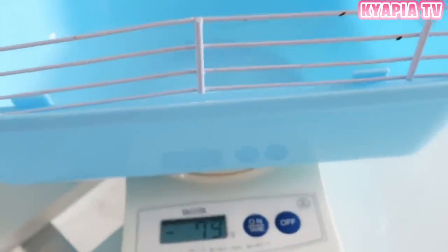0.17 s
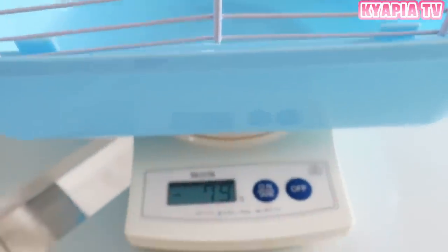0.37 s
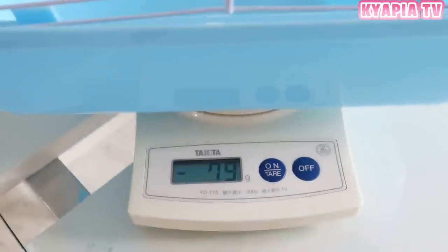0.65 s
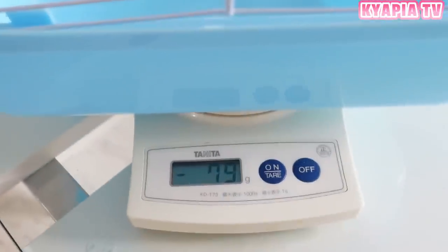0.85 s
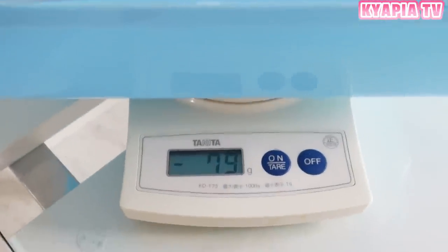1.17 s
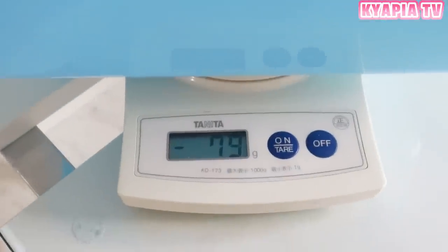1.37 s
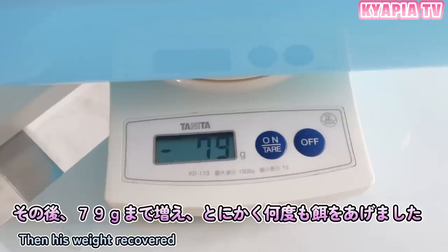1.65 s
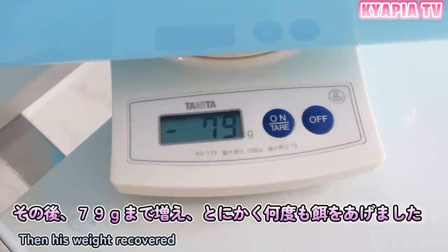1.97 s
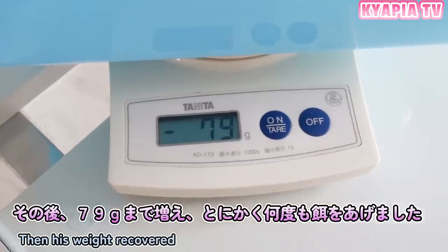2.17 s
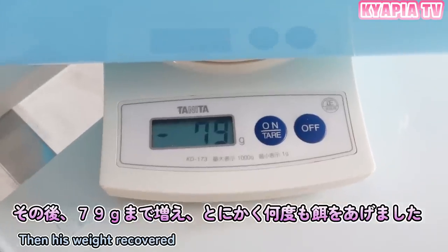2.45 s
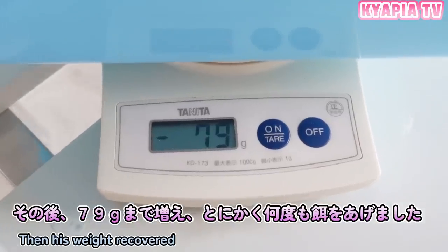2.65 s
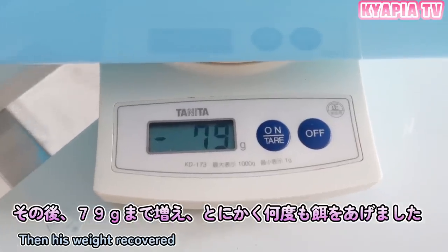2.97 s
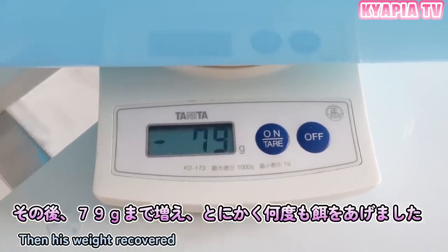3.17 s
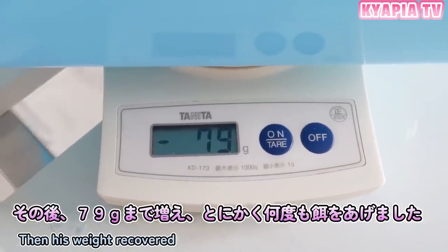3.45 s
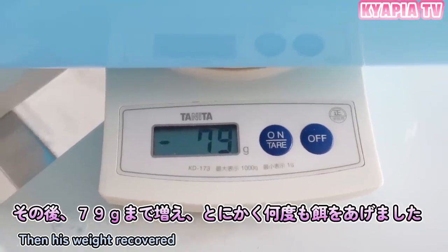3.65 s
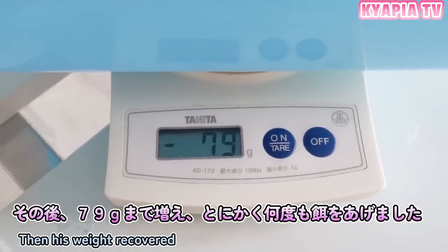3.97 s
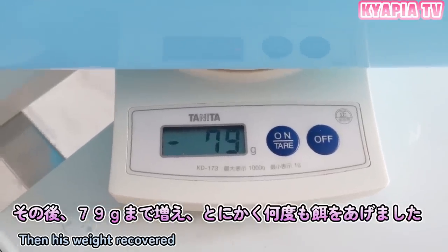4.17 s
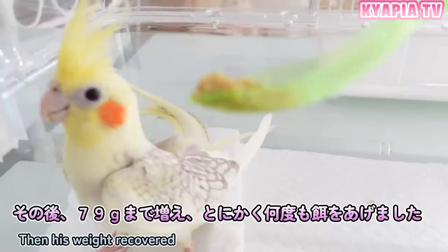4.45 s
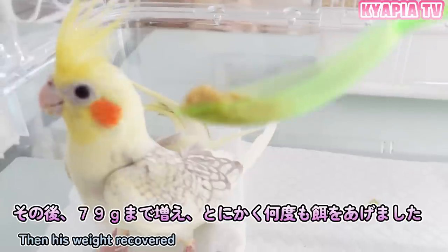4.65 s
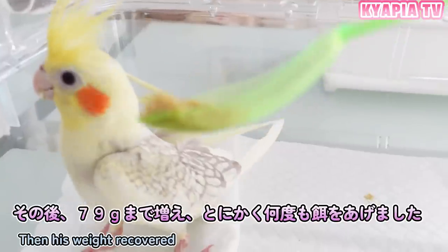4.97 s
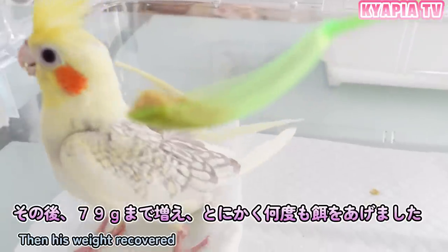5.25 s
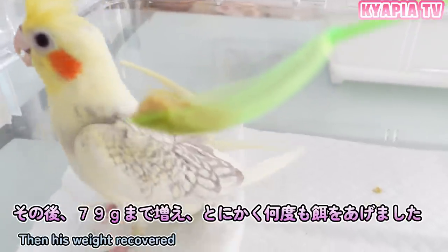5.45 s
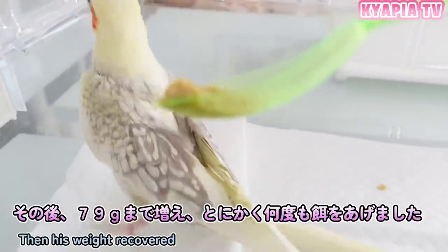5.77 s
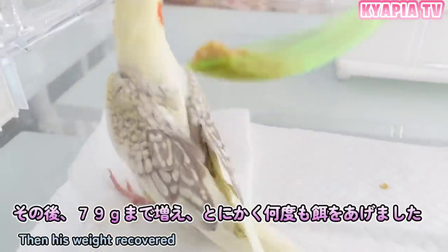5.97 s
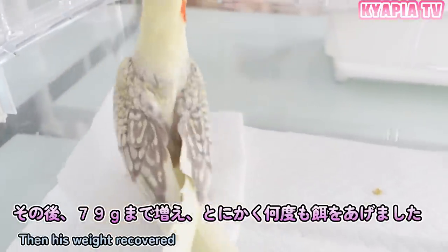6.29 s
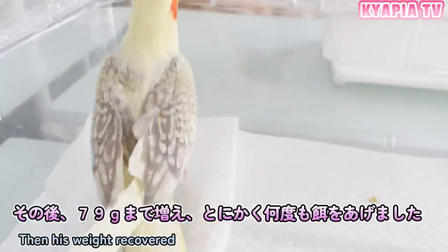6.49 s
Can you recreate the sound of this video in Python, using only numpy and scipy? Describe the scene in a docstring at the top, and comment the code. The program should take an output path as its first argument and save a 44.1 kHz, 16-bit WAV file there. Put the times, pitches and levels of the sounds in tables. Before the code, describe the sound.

A young cockatiel squawks harshly and squeaks among distant chirps and hollow knocks, then gives a loud rising whistle and finally soft begging rasps.

```python
"""Over a soft room wash and a low rumble, other birds chirp further off and things are knocked hollowly.
Claws tick and shuffle on paper, as a cockatiel chick squawks harshly, then breaks into thin squeaks.
Later come one loud gliding whistle, an abrupt click with a short noise burst, then a hiss and soft begging
rasps as its feet scratch. Voices are harmonics shaped by throat or beak; knocks are noise with ringing tones;
the rest is filtered noise. Echoes in a hard-walled room are added to all but wash and rumble."""
import sys
import numpy as np
from scipy import signal
from scipy.fft import rfft, irfft, next_fast_len
from scipy.io import wavfile
from scipy.ndimage import map_coordinates

SR = 44100
rng = np.random.default_rng(int(sys.argv[2]) if len(sys.argv) > 2 else 0)


def dump(signal):
    """Clip the signal to [-1, 1] and save it as 16-bit WAV at the path in sys.argv[1]."""
    limited = np.clip(np.atleast_2d(signal).T, -1, 1)
    pcm = np.round(limited * 32767).astype(np.int16)
    wavfile.write(sys.argv[1], SR, pcm)


N = 291942
TIME = np.arange(N) / SR
TOP_HZ = 15900  # upper edge of the sound

# Short clicks of noise: claw and beak ticks, and at 4.439 s an abrupt click that is neither.
# Each row: start in seconds, level in dB before onset and room, tilt in dB an octave
CLICKS = [(.508, -30.5, 2.5), (.521, -26, 2.5), (1.502, -25.5, -1.5), (1.707, -24.5, 2), (1.762, -32.5, -1),
          (2.078, -40.5, 0.5), (2.143, -37.5, 4), (3.051, -38.5, 9), (4.439, -49.5, -1), (5.553, -34.5, 7),
          (5.657, -35, -3), (5.78, -34, -1.5), (5.814, -35.5, 5), (5.884, -33, 13), (5.947, -42.5, 8),
          (6.045, -35.5, 6), (6.059, -30.5, -1), (6.201, -33, 6), (6.559, -33.5, 10), (6.574, -34, -4.5),
          (6.586, -34, -1.5)]
# Grainy bursts of noise: feet shuffling on paper, and at 4.437 s a short burst that is not.
# Each row: start in seconds, length in seconds, level in dB before the room, tilt in dB an octave
GRAINY_BURSTS = [(0.513, 0.4, -51.5, 4), (2.105, 0.32, -54, 5.5), (2.864, 0.35, -54, 10.5),
                 (4.437, 0.15, -53, 1), (5.11, 0.18, -58.5, 1.5), (5.314, 0.48, -51.5, 5),
                 (6.045, 0.51, -51.5, 4.5)]
# Tone colour of the clicks and grainy bursts. Each row: frequency in Hz, gain in dB
CLICK_COLOUR = [(300, -15.5), (1200, -4), (2200, 3), (4200, 3), (8000, -6), (12000, -14.5), (15500, -23.5)]


def undb(db):
    """Turn decibels into a plain multiplier."""
    return 10 ** (np.asarray(db) / 20)


def unit(x):
    """Scale to an average (rms) strength of 1."""
    return x / np.sqrt(np.mean(x ** 2) + 1e-18)


def gain_at(points, hz):
    """Read the gain at any frequency from a spectrum of (Hz, dB) points."""
    point_hz, point_db = np.transpose(points)
    return undb(np.interp(np.log(np.maximum(hz, 1)), np.log(point_hz), point_db))


def colour(x, points, tilt_db=0):
    """Filter by a spectrum, tilted in dB an octave and falling away below its first point; rms 1."""
    size = next_fast_len(len(x))
    hz = np.maximum(np.arange(size // 2 + 1) * SR / size, 1)
    # the tilt pivots at 1 kHz and is flat below 200 Hz
    tilt = undb(tilt_db * np.log2(np.maximum(hz, 200) / 1000))
    bass_fall = np.minimum(hz / points[0][0], 1) ** 2
    spectrum = rfft(x, size) * gain_at(points, hz) * tilt * bass_fall
    return unit(irfft(spectrum, size)[:len(x)])


def wobble(t, rate):
    """Smooth random wander of spread near 1, with `rate` new random values a second."""
    values = rng.standard_normal(4096)
    return map_coordinates(values, [(t - t[0]) * rate], order=3, mode="mirror")


def noise(t):
    """White noise as long as t."""
    return rng.standard_normal(len(t))


def curves(rows):
    """The times that a table spans, and each of its other columns drawn as a line along them."""
    s, *columns = np.transpose(rows)
    t = np.arange(int(s[0] * SR), int(s[-1] * SR)) / SR
    return [t] + [np.interp(t, s, column) for column in columns]


def span(length):
    """The times within a sound, and the share of it that has passed."""
    t = np.arange(int(length * SR)) / SR
    return t, t / length


def envelope(t, attack, release):
    """Smooth attack, hold and release (in seconds) over the times t."""
    rise = np.clip((t - t[0]) / attack, 0, 1)
    fall = np.clip((t[-1] - t) / release, 0, 1)
    return (np.sin(np.pi * rise / 2) * np.sin(np.pi * fall / 2)) ** 2


def add(track, start, x):
    """Mix x into the track from a start time, dropping what lies outside the track."""
    i = int(round(start * SR))
    x, i = x[max(-i, 0):], max(i, 0)
    track[i:i + len(x)] += x[:max(N - i, 0)]


def syrinx(t, hz, rough, throat, overtone_db=0, jitter=0.069, air=1.0, flutter=600, shimmer_db=6):
    """Harmonics of a bird's vibrating membranes; roughness shakes pitch and size and lets air through."""
    shaken_hz = hz * (1 + jitter * rough * wobble(t, flutter))
    phase = 2 * np.pi * np.cumsum(shaken_hz) / SR
    k = np.arange(1, int(TOP_HZ / hz.min()) + 1)[:, None]  # harmonic numbers
    lift = undb(overtone_db * (k > 1) * (2 / k) ** 2)  # the lowest overtones change most
    size = gain_at(throat, k * hz) * lift * (k * hz < SR / 2)
    strength = np.sqrt(np.sum(size ** 2, axis=0) / 2)
    tone = np.sum(size * np.sin(k * phase), axis=0) / strength
    # breath noise comes in puffs, one each cycle
    puffs = colour(noise(t) * (1 + np.cos(phase)), throat)
    shimmer = undb(shimmer_db * rough * wobble(t, 300))
    return unit((tone + air * rough * puffs) * shimmer)


def beak(hz, skirt_db=-19, far_db=-38):
    """One broad beak resonance as (Hz, dB) points: full strength in the middle, weaker to each side."""
    return [(hz / 4, far_db), (hz / 2, skirt_db), (hz / 1.31, 0),
            (hz * 1.293, 0), (hz * 1.46, skirt_db), (hz * 3, far_db)]


def blow(t, t60, spectrum, tilt_db=0):
    """A burst of noise-like vibration that dies by 60 dB in t60 seconds."""
    return colour(noise(t), spectrum, tilt_db) * undb(-60 * t / t60)


def click(db, tilt_db, onset_s=0.0006):
    """A quickly dying noise burst with a very short onset."""
    t = np.arange(SR // 4) / SR
    return undb(db) * blow(t, 0.05, CLICK_COLOUR, tilt_db) * (1 - np.exp(-t / onset_s))


def grainy_burst(length, db, tilt_db):
    """Filtered noise whose strength jumps about in fine grains and slower scratches."""
    grain_db, scratch_db = 5, 2  # spread of the fine grains, and of the slower scratches
    t, _ = span(length)
    grains = noise(t) * undb(grain_db * wobble(t, 550) + scratch_db * wobble(t, 43.3))
    rustle = colour(grains, CLICK_COLOUR, tilt_db)
    return undb(db) * envelope(t, attack=0.0024, release=0.11) * rustle


def is_abrupt(start):
    """Whether a start time is that of the abrupt click or its noise burst."""
    return 4.43 < start < 4.438 or 4.438 < start < 4.44


def background(levels, spectrum, flicker_db, side_db):
    """Filtered noise that swells and sinks; left and right differ by a second, slightly brighter noise."""
    mid = colour(noise(TIME), spectrum)
    side = colour(noise(TIME), spectrum, tilt_db=0.5)
    db = np.interp(TIME, *np.transpose(levels)) + flicker_db * wobble(TIME, 28)
    return undb(db) * (mid + undb(side_db) * np.array([side, -side]))


def room_air():
    """The room's background: a soft wash of noise."""
    # How loud the wash is. Each row: time in seconds, level in dB
    air_levels = [(0, -46), (.8, -45.5), (1.2, -53.5), (2.95, -46.5), (3.45, -53.5), (4.15, -60.5),
                  (5.25, -59), (5.6, -49.5), (6.62, -48)]
    # The wash's tone colour. Each row: frequency in Hz, gain in dB
    air_colour = [(24, -84), (40, -49), (106, -78), (235, -11), (522, -1), (670, -6), (797, -1.5),
                  (2110, 5), (2330, 3), (3740, 1.5), (4030, 1), (10700, -15.5), (15500, -24.5)]
    return background(air_levels, air_colour, flicker_db=1.5, side_db=-6)


def handling_rumble():
    """The low rumble of handling: filtered noise with an unsteady level."""
    # How loud the rumble is. Each row: time in seconds, level in dB
    rumble_levels = [(0, -73), (4.28, -82), (4.4, -63.5), (5.5, -76), (6.25, -58), (6.62, -70)]
    # The rumble's tone colour. Each row: frequency in Hz, gain in dB
    rumble_colour = [(40, 8), (90, 15.5), (150, 13.5), (300, 11), (420, -14), (560, 4.5), (900, 15),
                     (1600, -50)]
    return background(rumble_levels, rumble_colour, flicker_db=5.5, side_db=-2)


def chirps():
    """Other birds: chirps fall in pitch and roughen, peeps rise and mostly clear."""
    # Chirps. Each row: start in seconds, length in seconds, starting pitch in Hz,
    # beak resonance in Hz, level in dB before the room
    chirp_rows = [(-.08, .13, 1607, 4250, -34), (0.111, 0.13, 1816, 3750, -31),
                  (0.321, 0.12, 1874, 4630, -31), (1.243, 0.048, 3135, 5200, -24),
                  (1.349, .11, 1800, 3720, -33.5), (1.552, .11, 1902, 4660, -29.5),
                  (4.249, .12, 1788, 4360, -47)]
    # Peeps. Each row: start in seconds, length in seconds, top pitch in Hz,
    # rise as a share of the top, level in dB before the room, roughness at the start
    peep_rows = [(0.618, 0.036, 3290, 0.19, -32, 0.52), (2.14, .13, 3260, 0.24, -44.5, 0.7),
                 (2.497, .12, 5430, .31, -23, 0.46), (4.231, 0.12, 2820, 0.022, -51, 0.54),
                 (4.522, 0.097, 4615, 0.24, -39.5, 1.15), (4.673, 0.094, 4560, 0.34, -40.5, 1.05),
                 (4.837, 0.068, 4670, 0.3, -40, 0.96), (5.014, 0.1, 3860, 0.083, -47, 1.1),
                 (5.106, 0.042, 2825, 0.021, -40, 0.4), (5.161, 0.072, 4780, 0.28, -43, 0.52)]
    chirp_fall = .13  # share of the starting pitch
    chirp_rough_start, chirp_rough_end, peep_rough_end = 0.065, 0.857, .19
    out = np.zeros(N)
    for start, length, hz, beak_hz, db in chirp_rows:
        t, u = span(length)
        glide = np.sin(np.pi * u / 2) ** 2
        rough = chirp_rough_start + (chirp_rough_end - chirp_rough_start) * glide
        voice = syrinx(t, hz * (1 - chirp_fall * glide), rough, beak(beak_hz))
        add(out, start, undb(db) * envelope(t, attack=0.015, release=0.015) * voice)
    for start, length, top_hz, rise, db, rough_start in peep_rows:
        t, u = span(length)
        below = np.cos(np.pi * u / 2) ** 2  # 1 at the start, 0 on the top note
        rough = peep_rough_end + (rough_start - peep_rough_end) * below
        voice = syrinx(t, top_hz * (1 - rise * below), rough, beak(3790), air=0.93)
        add(out, start, undb(db) * envelope(t, attack=0.033, release=0.0095) * voice)
    return out


def knocks():
    """Each knock is a clatter of noise plus the hollow ringing tones of the thing struck."""
    # Knocks. Each row: start in seconds, clatter's starting level in dB before the room,
    # clatter's time to die by 60 dB in seconds, tilt in dB an octave, ring in dB beside the clatter
    knock_rows = [(0.178, -31.5, 0.13, -2, -28), (.563, -42, 0.21, .5, -39), (0.814, -46, 0.14, -10, 0),
                  (1.481, -34.5, 0.32, 2.5, -12.5), (1.495, -30, 0.081, 1.5, -6),
                  (1.525, -34.5, 0.32, -0.5, 0.5), (1.62, -33, 0.067, -1, -13),
                  (1.707, -34.5, 0.089, 0.5, -11), (1.922, -41, 0.032, -9, -9.5), (2.107, -41, 0.46, -2, 6),
                  (2.466, -26.5, 0.11, 2.5, -1), (2.509, -27.5, 0.12, 4, 1),
                  (3.655, -49.5, 0.061, 3.5, -3.5)]
    # The clatter's tone colour. Each row: frequency in Hz, gain in dB
    knock_colour = [(90, -33), (170, -35), (250, 2.5), (420, 1.5), (620, 5), (900, 6), (1350, 6),
                    (2500, -0.5), (5200, -7), (7700, -15), (15500, -31)]
    # Ringing tones. Each row: typical frequency in Hz, size in dB, time to die by 60 dB in seconds
    knock_modes = [(240, -9, 0.068), (275, 6, 0.067), (335.5, 1, 0.068), (447, -1, 0.074),
                   (889.5, 2, 0.047), (1360, -18, 0.31)]
    swell_s = 0.0042  # the hollow ring takes about this long to build
    out = np.zeros(N)
    t = np.arange(SR // 2) / SR
    for start, db, t60, tilt_db, ring_db in knock_rows:
        ring = np.zeros(len(t))
        for hz, size_db, life in knock_modes:
            mode_hz = hz * (1 + .02 * rng.standard_normal())  # a little different at every knock
            ring += undb(size_db - 60 * t / life) * np.sin(2 * np.pi * mode_hz * t)
        ring *= undb(ring_db) * (1 - np.exp(-t / swell_s))
        clatter = blow(t, t60, knock_colour, tilt_db)
        add(out, start, undb(db) * (clatter + ring))
    return out


def feet():
    """Short noise ticks of claw and beak, a soft step on the box floor and grainy rustle on paper."""
    # Steps. Each row: start in seconds, starting level in dB before the room,
    # time to die by 60 dB in seconds
    step_rows = [(6.097, -40, 0.32)]
    # The box floor's tone colour. Each row: frequency in Hz, gain in dB
    step_colour = [(100, -51), (270, 3), (400, -6), (570, 11.5), (800, 2), (1300, -12), (3000, -45)]
    out = np.zeros(N)
    for start, db, tilt_db in CLICKS:
        if not is_abrupt(start):
            add(out, start, click(db, tilt_db))
    t = np.arange(SR // 4) / SR
    for start, db, t60 in step_rows:
        add(out, start, undb(db) * blow(t, t60, step_colour))
    for start, length, db, tilt_db in GRAINY_BURSTS:
        if not is_abrupt(start):
            add(out, start, grainy_burst(length, db, tilt_db))
    return out


def squawk():
    """One harsh, rattling swell of the voice that cracks into thin rising squeaks."""
    # The squawk breaks to a lower register, then tightens and grows harsh.
    # Each row: time in seconds, pitch in Hz, roughness from 0 to 1
    squawk_rows = [(.838, 1130, 0.63), (.955, 1050, 0.55), (.965, 907, 0.54), (1.03, 900, 0.38),
                   (1.075, 944, .36), (1.11, 1115, 0.97), (1.215, 1128, 0.73)]
    # Squeaks that end it, each scooping up to its note. Each row: start in seconds,
    # length in seconds, top pitch in Hz, level in dB before the room, overtone lift in dB
    squeak_rows = [(1.2, .04, 1594, -18.5, 3), (1.266, .052, 2570, -15.5, -35)]
    # Throat and beak for the harsh call. Each row: frequency in Hz, gain in dB
    harsh_throat = [(600, -39), (900, -16), (1400, -13.5), (1830, -3.5), (2150, 1), (2700, -3.5),
                    (3300, -8), (4150, -19.5), (4650, -2), (5100, -12), (6600, -12), (7600, -22.5),
                    (9000, -22), (12000, -30), (15500, -47)]
    # Throat and beak for the squeaks. Each row: frequency in Hz, gain in dB
    squeak_throat = [(1400, 4), (3100, 12), (4300, -31), (6200, -22), (8000, -14.5), (15500, -21)]
    level_db, harsh_db = -15.5, -5.5  # level with no roughness; change at full roughness
    rasp_hz, rasp_db = 130, 2  # a fast tremble, deepest where the voice is roughest
    scoop = 0.46  # share of the top pitch that a squeak starts below it
    out = np.zeros(N)
    t, hz, rough = curves(squawk_rows)
    voice = syrinx(t, hz, rough, harsh_throat, 1.5, jitter=.072, air=.48, flutter=440, shimmer_db=3.5)
    rasp = np.sin(2 * np.pi * rasp_hz * t + 2 * wobble(t, 60))
    voice = unit(voice * undb(rasp_db * rough * rasp))
    loudness = undb(level_db + harsh_db * rough)
    add(out, t[0], loudness * envelope(t, attack=0.13, release=0.11) * voice)
    for start, length, top_hz, db, overtone_db in squeak_rows:
        t, u = span(length)
        hz = top_hz * (1 - scoop * (1 - u) ** 3)
        voice = syrinx(t, hz, .12, squeak_throat, overtone_db, jitter=.05, air=.1, flutter=380)
        add(out, start, undb(db) * envelope(t, attack=0.033, release=0.016) * voice)
    return out


def whistle():
    """A loud call that gains strength and loses overtones as it climbs, strained midway."""
    # The whistle's climb. Each row: time in seconds, pitch in Hz
    whistle_rows = [(3.374, 2050), (3.408, 2088), (3.444, 2210), (3.498, 2635), (3.594, 2921),
                    (3.652, 2897), (3.69, 3089), (3.79, 3171)]
    # Throat and beak for the clear call. Each row: frequency in Hz, gain in dB
    clear_throat = [(1400, -13), (2100, 4.5), (3000, 0), (4300, 0.5), (5300, -17.5), (6500, 5), (7600, -21),
                    (8700, -20.5), (10500, -23), (12000, -27.5), (15500, -35)]
    top_db, db_per_octave = -15.5, 9.5  # level on the top note before the room; gain in climbing
    top_overtone_db, overtone_db_per_octave = -9, -18  # the higher the note, the purer
    # midway up the voice strains: it weakens and turns rough and bright
    strain_s, strain_width_s = 3.497, 0.042
    strain_db, strain_rough, strain_overtone_db = -4, .26, 24
    out = np.zeros(N)
    t, hz = curves(whistle_rows)
    strain = np.exp(-((t - strain_s) / strain_width_s) ** 2)
    octaves = np.log2(hz / hz.max())  # 0 on the top note, negative below
    rough = 0.14 + strain_rough * strain
    overtone_db = top_overtone_db + overtone_db_per_octave * octaves + strain_overtone_db * strain
    voice = syrinx(t, hz, rough, clear_throat, overtone_db, jitter=.068, air=0, flutter=430)
    db = top_db + db_per_octave * octaves + strain_db * strain
    add(out, t[0], undb(db) * envelope(t, attack=0.038, release=0.093) * voice)
    return out


def abrupt_burst():
    """An abrupt click and a short burst of noise, almost together."""
    out = np.zeros(N)
    for start, db, tilt_db in CLICKS:
        if is_abrupt(start):
            add(out, start, click(db, tilt_db))
    for start, length, db, tilt_db in GRAINY_BURSTS:
        if is_abrupt(start):
            add(out, start, grainy_burst(length, db, tilt_db))
    return out


def hiss():
    """The chick hisses through its open beak: noise that swells and fades with a slight flutter."""
    # Throat and beak for the hiss. Each row: frequency in Hz, gain in dB
    hiss_throat = [(240, -64), (400, -37), (569, -5.5), (1070, -20), (1220, -2.5), (1400, -9.5), (1910, 6),
                   (2090, -2.5), (3510, -6), (4220, -17), (4630, -4.5), (5150, -21), (5730, -5),
                   (7440, -14), (15500, -13)]
    out = np.zeros(N)
    t, _ = span(.18)
    breath = colour(noise(t), hiss_throat) * envelope(t, attack=.065, release=.075)
    add(out, 5.37, breath * undb(-39 + 1.7 * wobble(t, 182)))
    return out


def begging():
    """Soft breathy rasps whose pitch rises and sinks a little in a shallow arch."""
    # Begging rasps. Each row: start in seconds, length in seconds,
    # pitch at the top of the arch in Hz, level in dB before the room
    beg_rows = [(5.659, 0.21, 706.5, -46), (5.957, 0.26, 697, -48), (6.245, 0.248, 687.5, -47)]
    # Throat and beak for begging. Each row: frequency in Hz, gain in dB
    beg_throat = [(650, -8), (1400, -4.5), (2050, 0), (2800, 3), (4200, 7), (5500, 3.5), (6300, 0),
                  (7300, -6.5), (10000, -8), (15500, -15)]
    arch, waver = 0.0297, 0.00477  # shares of the pitch
    out = np.zeros(N)
    for start, length, top_hz, db in beg_rows:
        t, u = span(length)
        hz = top_hz * (1 - arch * (2 * u - 1) ** 2 + waver * wobble(t, 29))
        voice = syrinx(t, hz, .14, beg_throat, jitter=0.043, air=0.49, flutter=620)
        add(out, start, undb(db) * envelope(t, attack=0.081, release=0.081) * voice)
    return out


def room(x, direct_db, wet_db, pan_db):
    """Direct sound plus dense fading echoes; the treble dies a little sooner and the bass is less wide."""
    t60_s, treble_t60_s = 0.51, 0.49  # time for the echoes to die by 60 dB
    t = np.arange(int(.8 * SR)) / SR
    white = rng.standard_normal((2, len(t)))
    low = signal.sosfilt(signal.butter(1, 6000, fs=SR, output="sos"), white)
    mid, side = low * undb(-60 * t / t60_s) + (white - low) * undb(-60 * t / treble_t60_s)
    side = undb(-7) * signal.sosfilt(signal.butter(2, 600, "high", fs=SR, output="sos"), side)
    echoes = undb(wet_db) * np.array([mid + side, mid - side]) / np.sqrt(np.sum(mid ** 2))
    # a positive pan favours the left
    direct = undb(direct_db + np.array([[pan_db], [-pan_db]]) / 2) * x
    return direct + signal.fftconvolve(x[None], echoes, axes=1)[:, :N]


def scene():
    """The loud calls fill the room; the begging and scratching are close by."""
    return (room_air()
            + handling_rumble()
            + room(chirps(), direct_db=-9, wet_db=-3.0, pan_db=7.0)
            + room(knocks(), direct_db=2, wet_db=6, pan_db=-8.5)
            + room(feet() + abrupt_burst(), direct_db=0.5, wet_db=-2.5, pan_db=3.5)
            + room(squawk(), direct_db=-4.5, wet_db=-2, pan_db=7.5)
            + room(whistle(), direct_db=-2.5, wet_db=-2, pan_db=6.5)
            + room(begging() + hiss(), direct_db=2.5, wet_db=0, pan_db=1))


def record(dry):
    """Close-set microphone ports hear the bass alike and weaken its depths; the top is cut off."""
    ports_alike_hz, low_cut_hz = 465, 165
    mid, side = (dry[0] + dry[1]) / 2, (dry[0] - dry[1]) / 2
    side_filter = signal.butter(1, ports_alike_hz, "high", fs=SR, output="sos")
    side = signal.sosfiltfilt(side_filter, side)
    low_cut = signal.butter(4, low_cut_hz, "high", fs=SR, output="sos")
    thin = signal.sosfilt(low_cut, np.array([mid + side, mid - side]))
    top_cut = signal.ellip(10, .2, 80, TOP_HZ, fs=SR, output="sos")
    return signal.sosfilt(top_cut, thin)


dry = scene()
out = record(dry)
dump(out)
```